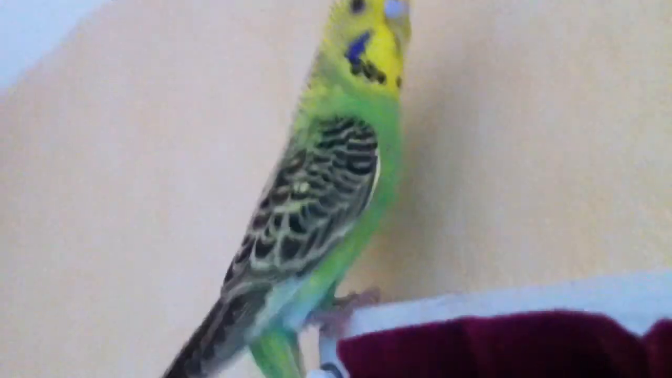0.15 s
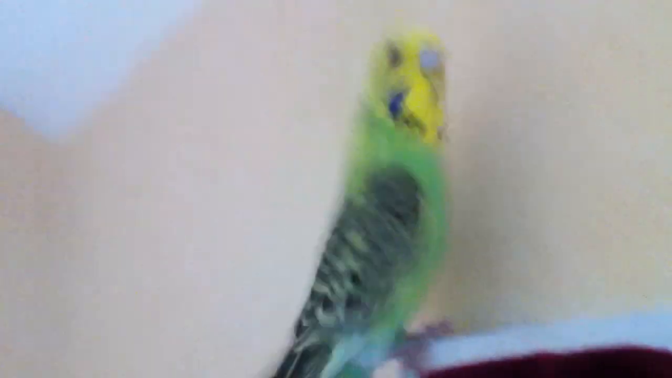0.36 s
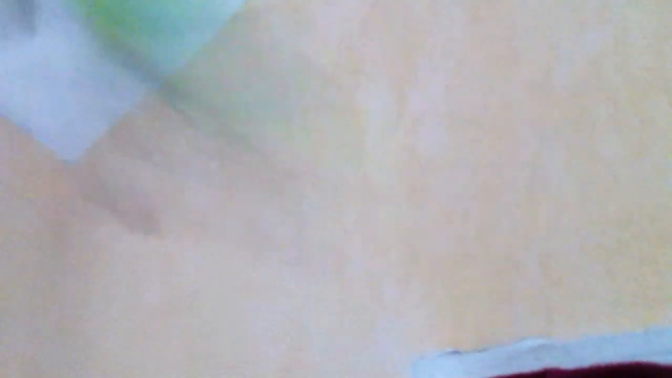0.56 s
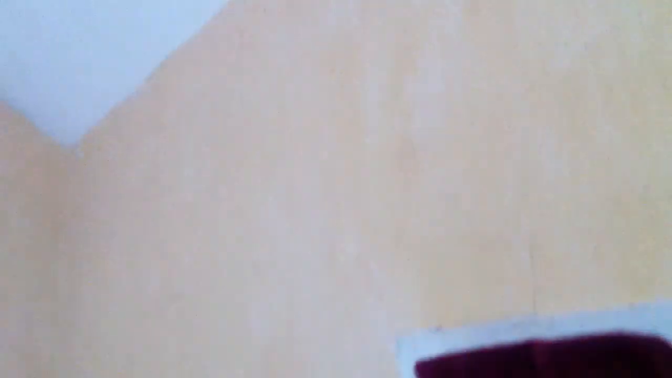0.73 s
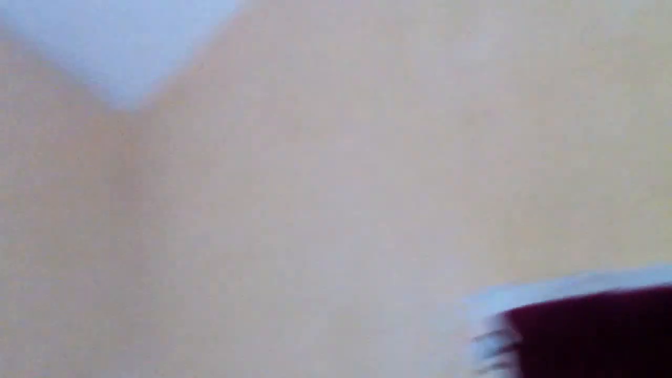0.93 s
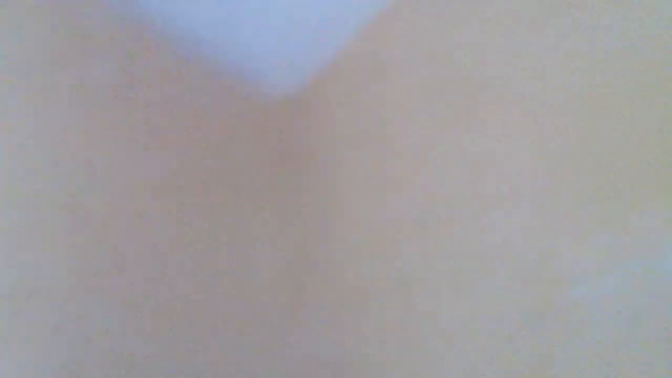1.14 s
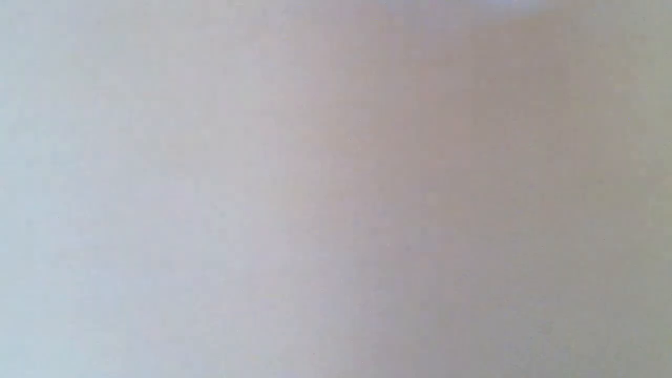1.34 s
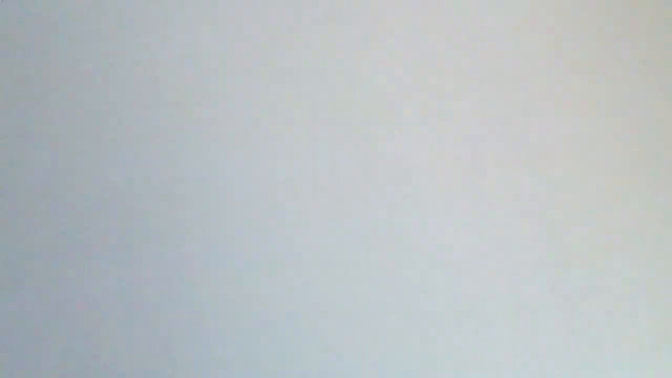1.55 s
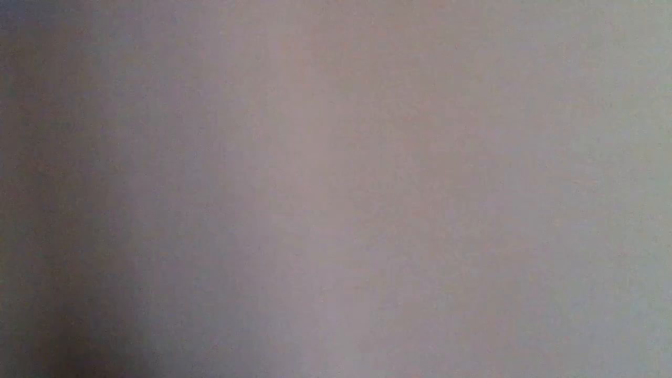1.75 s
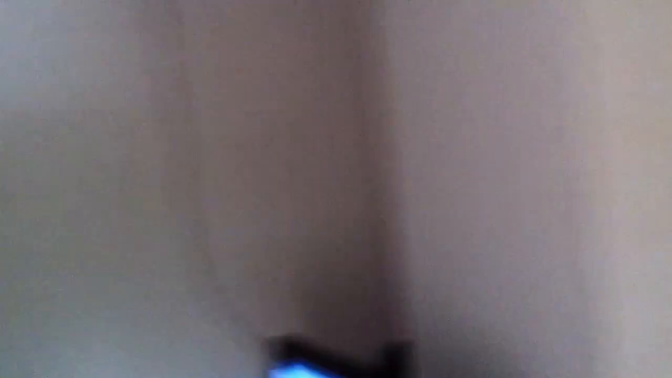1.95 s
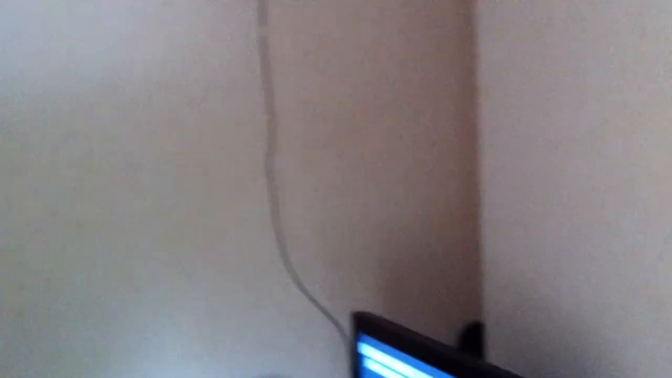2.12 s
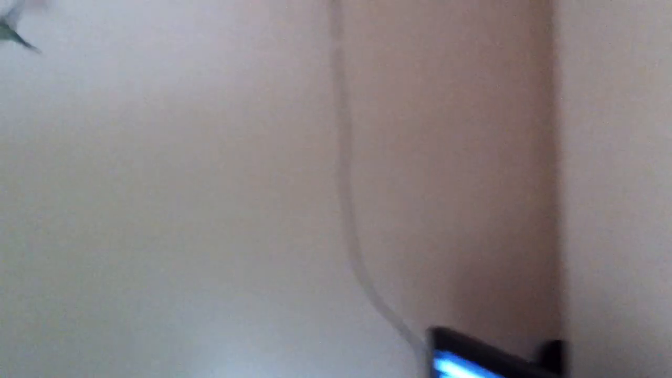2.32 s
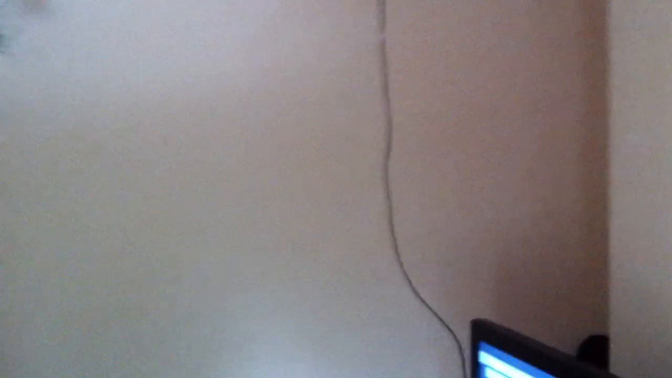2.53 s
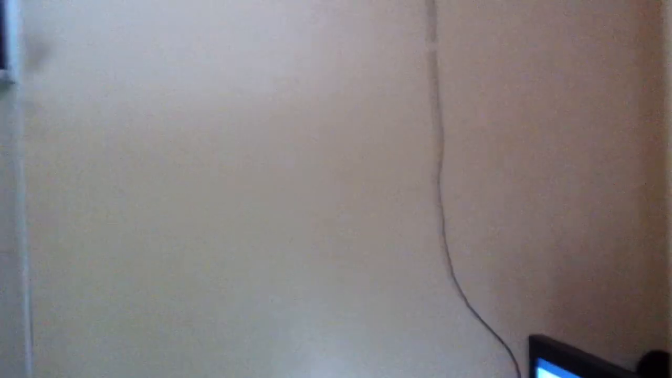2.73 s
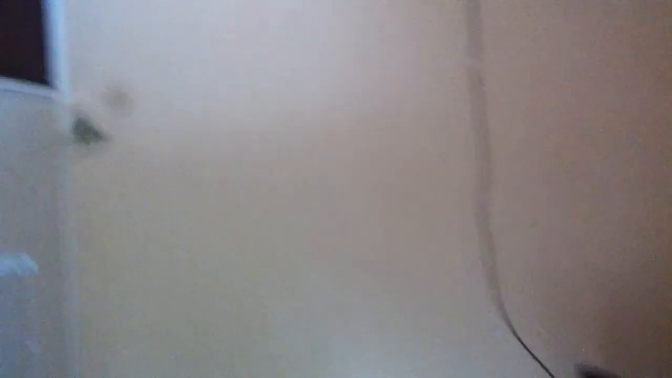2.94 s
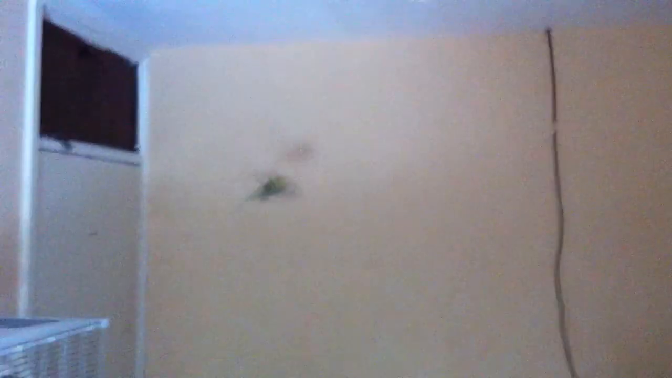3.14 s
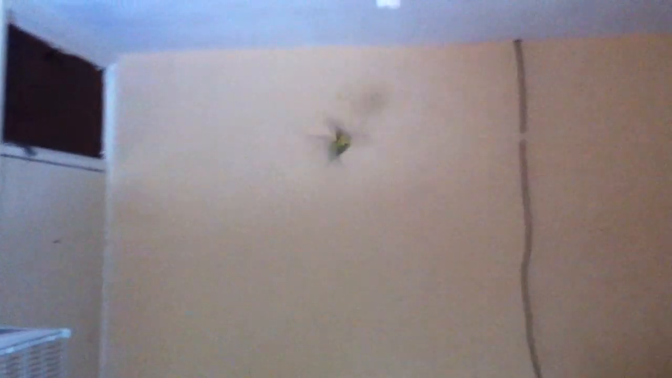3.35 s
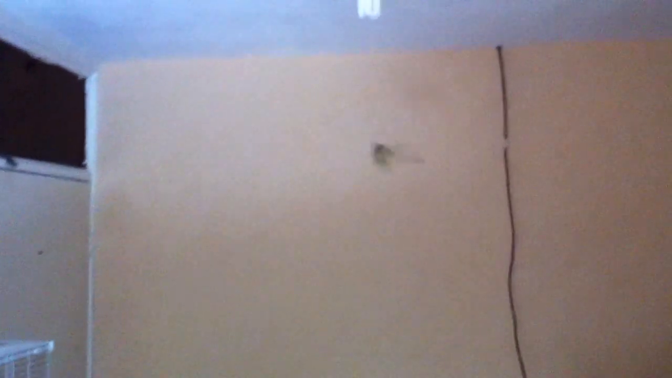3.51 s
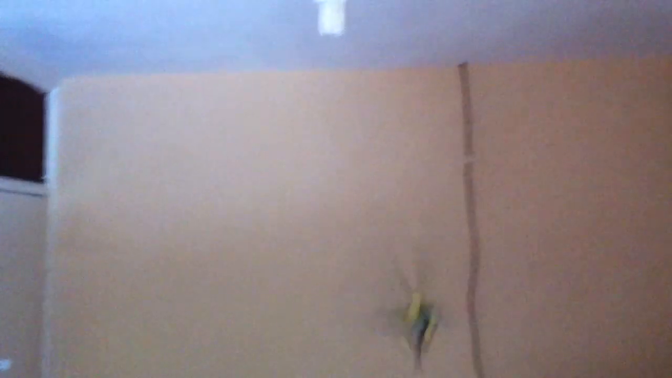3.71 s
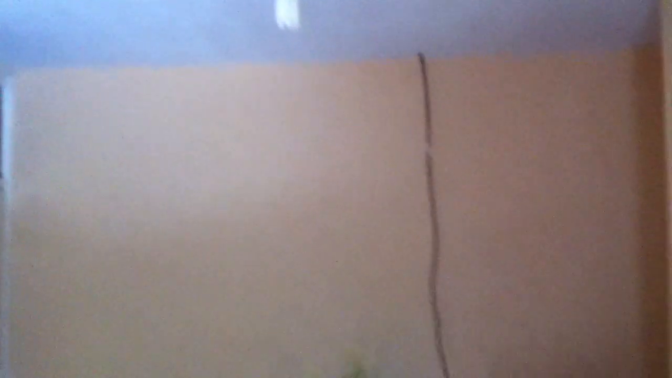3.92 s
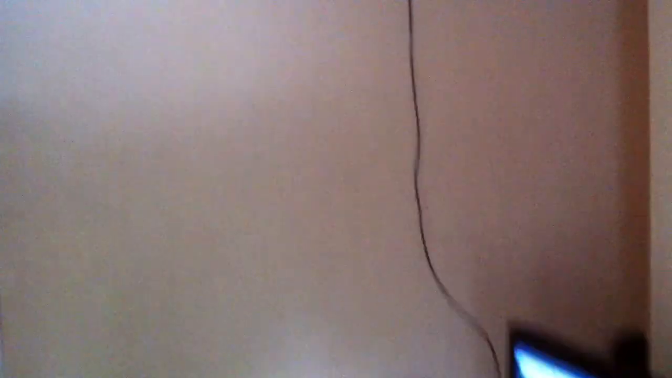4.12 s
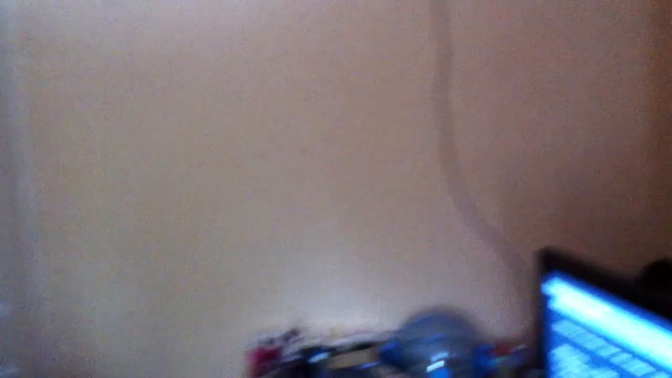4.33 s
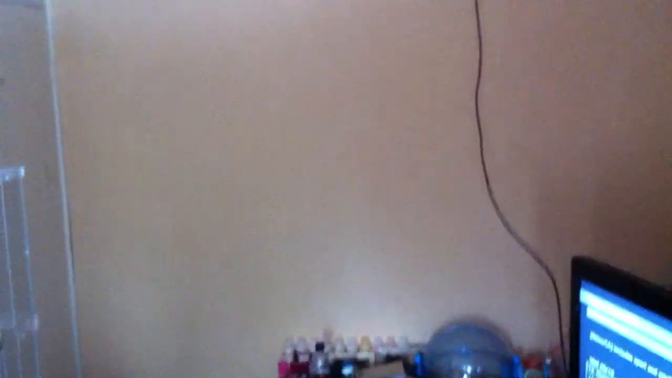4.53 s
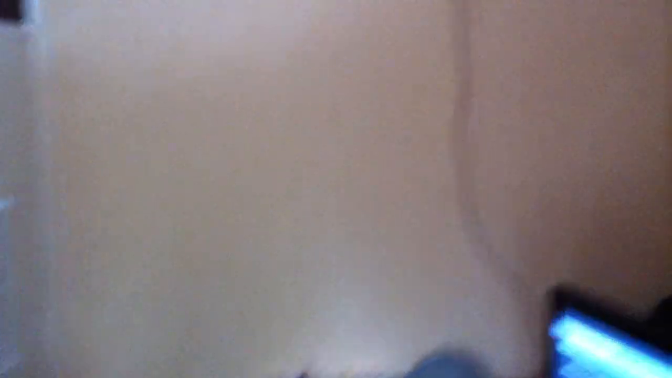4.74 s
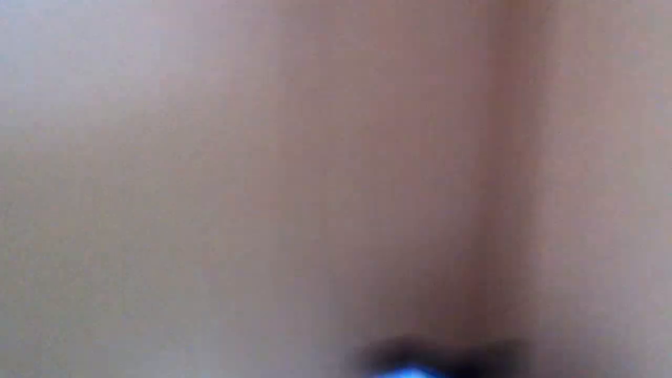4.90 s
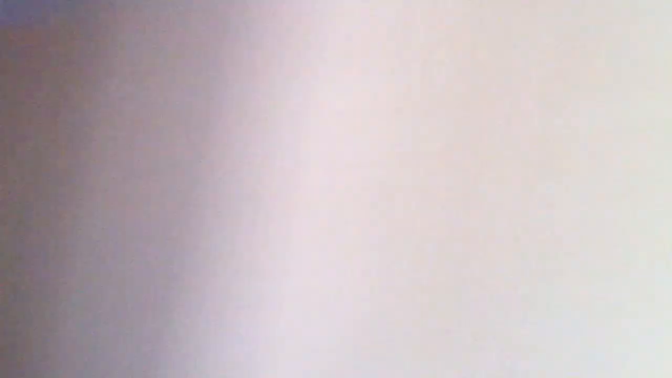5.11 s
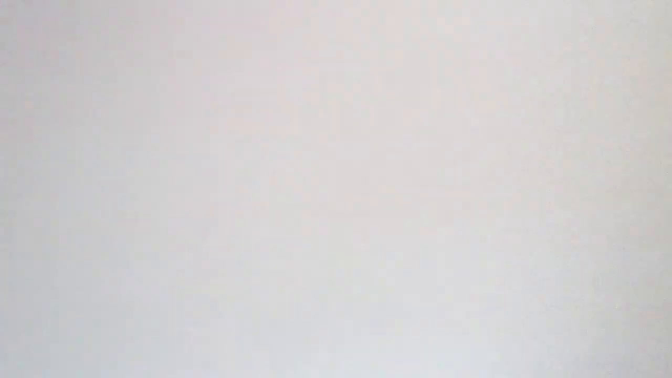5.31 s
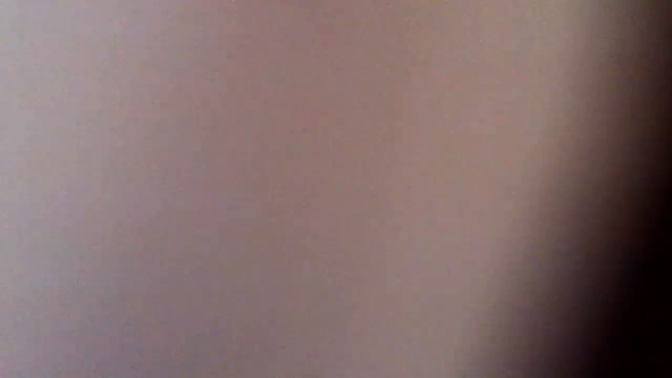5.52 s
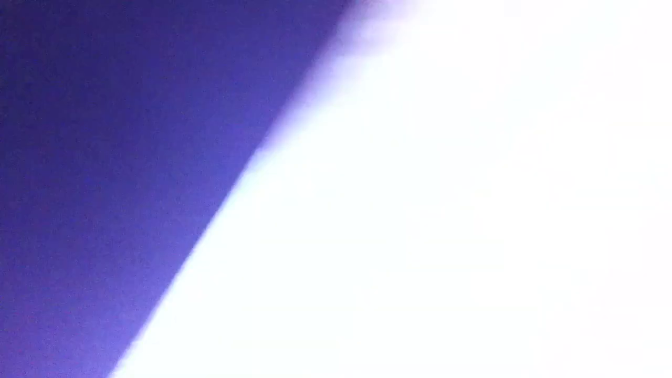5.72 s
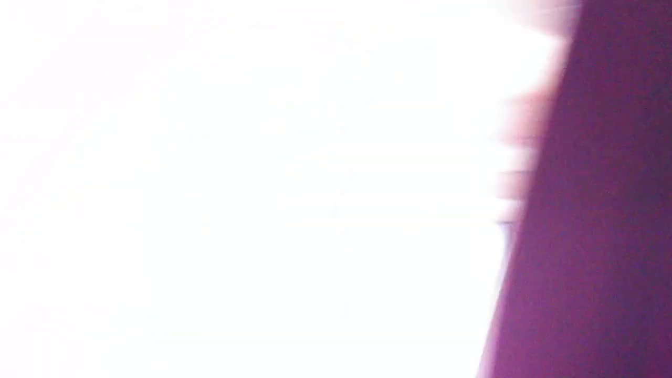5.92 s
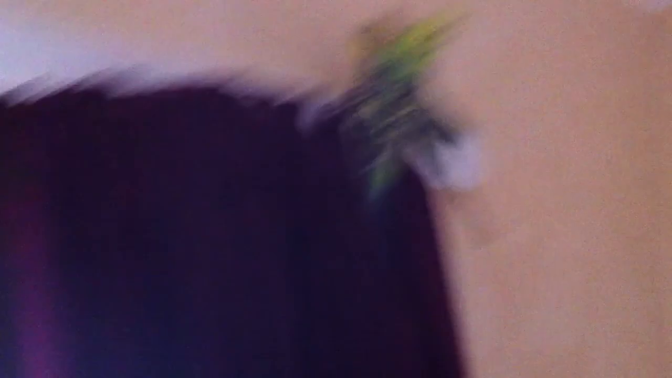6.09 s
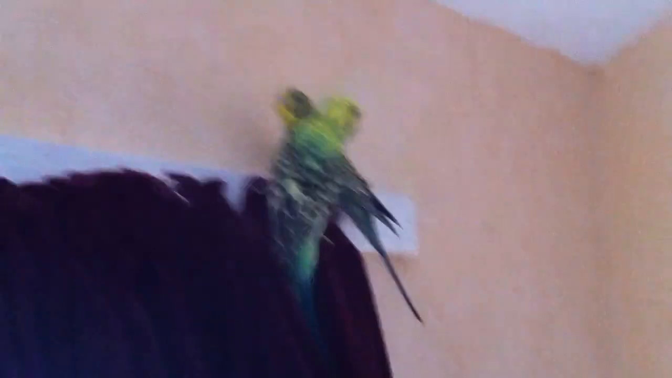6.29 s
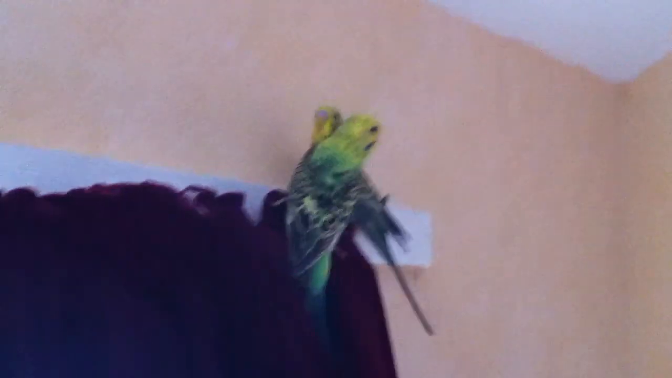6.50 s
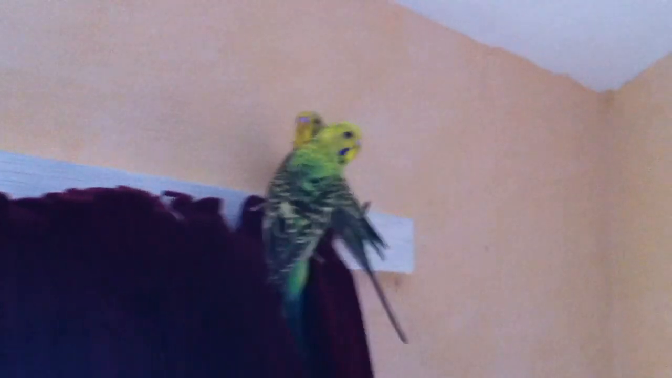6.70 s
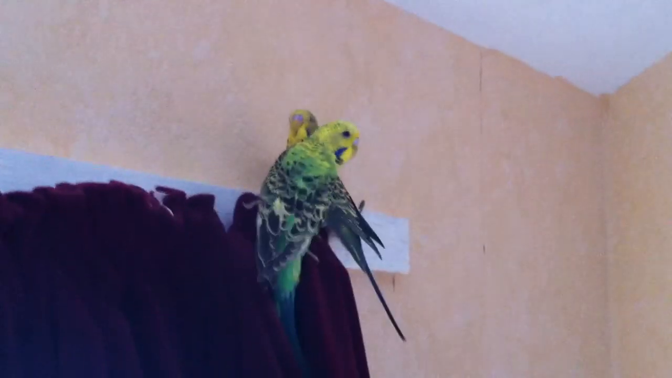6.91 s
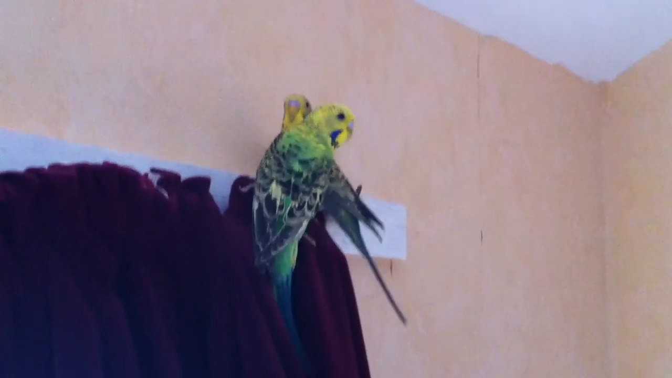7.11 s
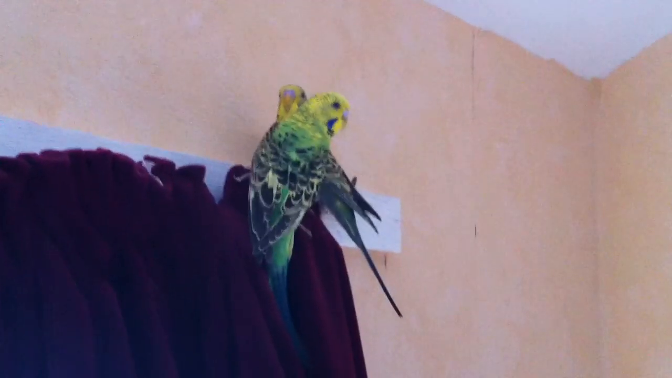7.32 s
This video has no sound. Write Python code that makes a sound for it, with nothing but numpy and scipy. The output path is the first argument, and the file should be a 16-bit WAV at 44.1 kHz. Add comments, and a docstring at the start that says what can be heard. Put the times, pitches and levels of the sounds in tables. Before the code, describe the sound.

Close wing wash overloads the scene first: irregular low thuds and gusts within the first second, softening soon after. A quiet chirp sits among them. Then only airy wing whirr and feather hiss are heard across a small plastered room, until one bird squawks loudly and rapidly. A knock and brisk flapping follow, then lighter flutters. After landing come faint ticks, one bright click, and quiet hiss with slight hum.

```python
"""Bursts of wing wash buffet the microphone as two budgerigars take off from the curtain rail beside it.
They circle a small room: feathers swish and snap, the wings whirr at a distance, and one bird gives
a soft chirp and later a loud squawk. Ticks and taps last beyond the landing, over faint hiss and hum.
Pressure swings and band noise make the wash, stroke-shaped noise the feathers, decaying noise the ticks
and slurred whistles the calls; feathers, ticks and calls also feed a short reverberation."""
import sys
import numpy as np
from scipy import signal
from scipy.fft import rfft, irfft
from scipy.io import wavfile

SR = 44100
rng = np.random.default_rng(int(sys.argv[2]) if len(sys.argv) > 2 else 0)


def to_wav(sig):
    """Store sig (one row per channel, or 1-D mono) as 16-bit WAV at the path in sys.argv[1].

    Samples outside -1..1 are clipped; the rate is SR.
    """
    pcm = np.clip(np.atleast_2d(sig), -1, 1) * 32767
    pcm = np.round(pcm).astype(np.int16)
    wavfile.write(sys.argv[1], SR, pcm.T)  # frames by channels


N = 324135
TIME = np.arange(N) / SR


def undb(db):
    """Decibels to gain."""
    return 10 ** (np.asarray(db) / 20)


def unit(x):
    """Scale to rms 1."""
    return x / np.sqrt(np.mean(x ** 2))


def level_curve(rows):
    """Join (s, dB) points by straight lines in time."""
    s, db = np.transpose(rows)
    return np.interp(TIME, s, db)


def along(points, hz):
    """Read (Hz, value) points on a log-frequency axis."""
    f, value = np.transpose(points)
    return np.interp(np.log(np.maximum(hz, 1)), np.log(f), value)


def coloured(x, colour):
    """Filter with a spectrum of (Hz, dB) points."""
    gain = undb(along(colour, np.fft.rfftfreq(N, 1 / SR)))
    return irfft(rfft(x) * gain, N)


def noise(colour):
    """Noise of rms 1 with the given spectrum."""
    return unit(coloured(rng.standard_normal(N), colour))


def band(x, low_hz, high_hz, order=2):
    """Butterworth band-pass."""
    sos = signal.butter(order, [low_hz, high_hz], "band", fs=SR, output="sos")
    return signal.sosfilt(sos, x)


def walk(rate, size=N):
    """Random wander of rms 1: straight lines between `rate` random knots per second."""
    knots = rng.standard_normal(size)
    return unit(np.interp(np.arange(size) * rate / SR, np.arange(size), knots))


def add(track, s, sound):
    """Mix a sound into a track from time s on."""
    i = max(int(s * SR), 0)
    track[i:i + len(sound)] += sound[:max(N - i, 0)]


def room_tone(floor_db=-69.0):
    """The empty room: faint even hiss with a hum that wavers in pitch."""
    # spectrum of the hiss: [f/Hz, relative level/dB]
    hiss_colour = [(18, -67), (30, -33.5), (114, -29.5), (137, -18.5), (208, -10), (243, -17), (299, -23.5),
                   (945, -23.5), (2910, -28.5), (3880, -29), (4540, -29.5), (7650, -30.5), (15500, -31.5)]
    # hum lines: [f/Hz, level/dB]
    hum_lines = [(215.3, -83), (441.4, -93.5)]
    hum = np.zeros(N)
    for hz, db in hum_lines:
        phase = 2 * np.pi * np.cumsum(hz + 2 * walk(4.7)) / SR
        hum += undb(db) * np.sqrt(2) * np.sin(phase)
    return undb(floor_db) * noise(hiss_colour) + hum


def room(x):
    """Small plastered room: noise bands decay at their own rates, the extreme treble fastest."""
    # time to decay by 60 dB: [f/Hz, decay/s]
    decay_times = [(150, 0.29), (1000, 0.3), (3200, 0.27), (8000, 0.33), (16000, .2)]
    t = TIME[:SR * 3 // 5]
    edges = np.geomspace(80, 20000, 9)
    tail = np.zeros(len(t))
    for low_hz, high_hz in zip(edges, edges[1:]):
        t60 = along(decay_times, np.sqrt(low_hz * high_hz))
        tail += band(rng.standard_normal(len(t)), low_hz, high_hz) * np.exp(-np.log(1000) * t / t60)
    # the tail starts 3 ms after the direct sound
    tail *= np.clip((t - .003) / 0.0013, 0, 1)
    return signal.fftconvolve(x, tail / np.sqrt(np.sum(tail ** 2)))[:N]


def whirr(whirr_db=-2.5, flutter_db=3.0, swell_width=0.21):
    """Air pushed aside by the wings, heard from across the room; now and then it swells with a hollow tone."""
    # whirr as the birds fly out: [t/s, relative level/dB]
    out_levels = [(1.7, -67.5), (1.986, -54), (2.212, -63.5), (2.6, -60), (2.738, -65.5), (2.838, -59),
                  (3.15, -61)]
    # whirr as they come back: [t/s, relative level/dB]
    back_levels = [(3.52, -61.5), (3.62, -47.5), (3.89, -57), (3.94, -72), (4.22, -57.5), (4.24, -51.5),
                   (4.33, -67.5), (5.1, -60), (5.46, -81), (5.72, -69.5), (5.89, -77), (6.04, -68),
                   (6.7, -84)]
    # spectrum of the whirr: [f/Hz, relative level/dB]
    whirr_colour = [(30, -37), (85, -22), (150, 2.5), (240, -2), (320, -2.5), (480, -3.5), (700, -12.5),
                    (1200, -18.5), (3000, -38)]
    # soft hollow swells: [centre t/s, relative level/dB, half length/s, centre f/Hz]
    hollow_swells = [(1.997, -62.5, 0.1, 510), (2.553, -60, 0.096, 440), (2.999, -64.5, 0.096, 450),
                     (3.643, -52, 0.054, 460), (5.04, -65, 0.084, 445)]
    level_db = level_curve(list(out_levels) + list(back_levels))
    out = noise(whirr_colour) * undb(level_db + whirr_db)
    air = rng.standard_normal(N)
    for s, db, length, hz in hollow_swells:
        tone = unit(band(air, hz * (1 - swell_width), hz * (1 + swell_width)))
        out += undb(db) * tone * np.exp(-((TIME - s) / length) ** 2 / 2)
    return out * undb(flutter_db * walk(36))


def ticks(claw_clicks=3):
    """Snaps, taps and a skipping claw: short decaying cracks, each in its band, direct and sent to the room."""
    # bright feather snaps: [t/s, level/dB, fade/s, room send/dB]
    feather_snaps = [(0.056, -47, 0.022, -24), (.303, -43.5, 0.0013, -1), (.8655, -30.5, .003, -14),
                     (3.591, -40.5, 0.0093, -7), (3.6737, -30.5, .002, 1.5), (4.29, -60, 0.0026, -20)]
    # dull taps and bumps around the room: [t/s, level/dB, fade/s, centre f/Hz, room send/dB]
    dull_taps = [(.656, -45, 0.007, 657, 3.5), (.951, -44, 0.0052, 700, -7), (2.456, -43, .002, 900, -16.5),
                 (3.616, -26.5, 0.0021, 1220, -8.5), (5.046, -49, .004, 1430, -1),
                 (6.05, -57, 0.0081, 480, 5.5), (6.269, -60, .0047, 2460, -3),
                 (6.808, -57.5, 0.018, 1810, -2), (7.025, -56, 0.0062, 1900, -3.5),
                 (7.106, -58.5, 0.005, 1250, -5.5), (7.24, -49, 0.0097, 700, -2.5)]
    tap_spread = 2.26  # a tap reaches this factor above and below its centre
    cracks = [(s, db, fade, 604, 12150, room_db) for s, db, fade, room_db in feather_snaps]
    for s, db, fade, hz, room_db in dull_taps:
        cracks.append((s, db, fade, hz / tap_spread, hz * tap_spread, room_db))
    # a claw clicks on the rail and skips on every 6 ms, 12 dB weaker each time
    for k in range(claw_clicks):
        cracks.append((6.7745 + k * .006, -25.5 - k * 12, .0006, 6300, 14500, -11))
    direct, send = np.zeros(N), np.zeros(N)
    t = TIME[:SR // 10]
    for s, db, fade, low_hz, high_hz, room_db in cracks:
        burst = unit(band(rng.standard_normal(len(t)), low_hz, high_hz))
        crack = undb(db) * burst * np.exp(-t / fade)
        add(direct, s, crack)
        add(send, s, crack * undb(room_db))
    return direct, send


def chirp(length, from_hz, to_hz, rasp, jitter=.016, rasp_jitter=0.022, tremor=.016, shimmer_db=3.,
          half_db=-10., buzz_hz=690., buzz_db=-13.5):
    """One note: the syrinx slurs a tremulous whistle; rasp shakes the pitch and adds half-pitch lines."""
    # first harmonics of the voice, from the fundamental up: [level/dB]
    harmonic_levels = [-3, -25.5, -31, -32.5, -32.5]
    attack_s, release_s = 0.0026, 0.0033
    t = np.arange(0, length, 1 / SR)
    hz = from_hz + (to_hz - from_hz) * np.sin(np.pi / 2 * t / length) ** 2
    wobble, flutter, quaver = (walk(rate, size=SR // 4)[:len(t)] for rate in (1500, 450, 300))
    shaken_hz = hz * (1 + (jitter + rasp_jitter * rasp) * wobble + tremor * quaver)
    phase = 2 * np.pi * np.cumsum(shaken_hz) / SR
    voice = sum(undb(db) * np.sin((k + 1) * phase) for k, db in enumerate(harmonic_levels))
    # alternate cycles differ where the note rasps
    halves = np.sin(phase / 2) + voice * np.cos(phase / 2)
    # on the high notes a fast buzz of the membrane throws a sideband below the whistle
    sideband = np.clip((hz - 2900) / 300, 0, 1) * np.sin(phase - 2 * np.pi * buzz_hz * t)
    voice = voice + np.clip(rasp, 0, 1) * undb(half_db) * halves / 2 + undb(buzz_db) * sideband
    envelope = np.clip(np.minimum(t / attack_s, (length - t) / release_s), 0, 1)
    return np.sqrt(2) * voice * envelope * undb(shimmer_db * flutter)


def budgie():
    """A soft chirp, then a loud squawk: slurred notes coloured by throat and beak."""
    # notes of both calls: [start t/s, length/s, from f/Hz, to f/Hz, relative level/dB, rasp 0-1]
    call_notes = [(1.013, 0.027, 2700, 2550, -42.5, .1), (1.037, 0.045, 3314, 3256, -43.5, 0.9),
                  (1.064, 0.017, 2690, 2670, -42, .2), (1.077, 0.026, 3300, 3260, -43, .3),
                  (1.099, 0.023, 2743, 2543, -41.5, 0.35), (1.108, 0.017, 3525, 3424, -40, .4),
                  (3.174, .009, 4340, 3897, -30.5, 0), (3.182, .018, 3090, 3100, -27.5, .7),
                  (3.197, 0.012, 3896, 4050, -26.5, 0.9), (3.204, 0.022, 4097, 2791, -21.5, 0.2),
                  (3.229, 0.028, 4060, 3160, -24.5, 0), (3.24, 0.013, 1674, 2170, -27, 0),
                  (3.249, .043, 4200, 2646, -21, .05), (3.293, 0.018, 3690, 3793, -19, 0),
                  (3.318, 0.041, 2630, 2770, -28.5, 0.2), (3.366, .025, 3523, 3434, -27.5, 0.4),
                  (3.402, 0.019, 2816, 2485, -32, .1), (3.415, .038, 3476, 3387, -35, 0.13)]
    # colour of throat and beak: [f/Hz, gain/dB]
    throat_colour = [(1000, -27), (1600, -2.5), (2700, -1), (4200, 0), (5200, 1.5), (6300, 1.5), (7300, 4),
                     (9300, 7), (11000, -17.5), (15000, 9.5)]
    out = np.zeros(N)
    for s, length, from_hz, to_hz, db, rasp in call_notes:
        add(out, s, undb(db) * chirp(length, from_hz, to_hz, rasp))
    return coloured(out, throat_colour)


def airborne(landed_s=6.3, settle_s=.2):
    """1 while the birds fly; dies away exponentially once they have landed."""
    return np.exp(-np.maximum(TIME - landed_s, 0) / settle_s)


def feathers(rush_db=1., beat_db=1.1, grain_db=2.0):
    """Feathers hiss at every stroke and rub over each other in fine grains; far strokes are duller."""
    # flurries of hard strokes:
    # [first stroke t/s, strokes/count, first level/dB, last level/dB, dull share 0-1]
    stroke_flurries = [(.055, 1, -44.5, -44.5, 0.03), (.204, 3, -52, -52, .7), (.654, 3, -50.5, -46, 0.06),
                       (0.892, 2, -49.5, -66, 1), (1.163, 1, -56.5, -56, 0.5), (2.217, 2, -56, -51, 0.34),
                       (2.965, 1, -60, -60, .9), (3.571, 2, -49, -40, 0.46), (3.694, 2, -47, -46.5, 0),
                       (4.178, 3, -54.5, -48.5, 0.03), (4.57, 5, -54.5, -60, 0), (5.575, 1, -56, -58, .4),
                       (5.688, 3, -54, -56, 0.73)]
    # air rushing through the flight feathers as the birds come and go: [t/s, relative level/dB]
    rush_levels = [(.1, -60), (.55, -61.5), (.71, -54.5), (.82, -63.5), (.9, -58.5), (1.3, -67),
                   (1.75, -64.5), (2.3, -61), (2.7, -66), (3.05, -62.5), (3.53, -66), (3.69, -50.5),
                   (3.86, -59), (3.98, -71), (4.15, -61.5), (4.4, -69), (5.07, -65), (5.25, -74.5),
                   (5.77, -62), (5.86, -75)]
    # spectrum of near strokes and of the rush: [f/Hz, relative level/dB]
    near_colour = [(30, -24), (150, -4), (400, 3), (900, 3.5), (2200, 3), (4500, -1.5), (8000, -2.5),
                   (14000, -2), (16000, -5.5)]
    # spectrum of far strokes: [f/Hz, relative level/dB]
    far_colour = [(30, -33.5), (150, -12.5), (500, -7.5), (1000, -1.5), (1900, -1.5), (3000, -5.5),
                  (5000, -15.5), (15000, -23)]
    wing_beat_hz, rise_s, fade_s = 18., .013, .011
    bright, dull = np.zeros(N), np.zeros(N)  # power of the near and far strokes
    t = TIME[:SR // 4]
    fade = np.exp(-np.abs(t - rise_s) / fade_s / 2)
    stroke = np.where(t < rise_s, (t / rise_s) ** 2, fade)
    for first, count, first_db, last_db, dull_share in stroke_flurries:
        count = int(count)
        times = first + np.arange(count) / wing_beat_hz
        for s, db in zip(times, np.linspace(first_db, last_db, count)):
            power = (undb(db) * stroke) ** 2
            add(bright, s - rise_s, (1 - dull_share) * power)
            add(dull, s - rise_s, dull_share * power)
    # between the strong strokes the rush throbs with a slightly uneven wing beat
    beat = np.sin(2 * np.pi * np.cumsum(wing_beat_hz * (1 + 0.089 * walk(20.0))) / SR)
    rush = undb(level_curve(rush_levels) + rush_db + beat_db * beat) * airborne()
    hiss = noise(near_colour) * np.sqrt(bright + rush ** 2) + noise(far_colour) * np.sqrt(dull)
    return hiss * undb(grain_db * walk(900))


def pressure_swing(hz, ring=1.1, port_hz=230., port_width_hz=85., bass_cut_hz=125.0,
                   steepness=0.92, tail_power=2.84):
    """One eddy swings the pressure at the microphone, which cuts its bass and rings low after it."""
    t = np.arange(-SR // 20, SR // 20) / SR
    u = np.pi * hz * steepness * t
    swing = band(u / (1 + u ** 2 / 2) ** (tail_power + 1), bass_cut_hz, 2000, order=3)
    ringing = band(swing, port_hz - port_width_hz / 2, port_hz + port_width_hz / 2, order=1)
    return swing + ring * ringing


def wing_wash(gustiness_db=4.0, fast_db=7.0, fast_low_hz=300., fast_high_hz=560.):
    """Strong eddies hit the microphone as single pressure swings; smaller ones churn in the birds' wakes."""
    # the strongest eddies: [t/s, peak level/dB, nominal swing speed f/Hz]
    strong_eddies = [(0.056, -38.5, 160), (.214, -38, 146), (.366, -23, 499), (.383, -17.5, 399),
                     (0.388, -17.5, 620), (.393, -8.5, 434), (0.43, -16, 470), (.489, -11, 457),
                     (.497, -17, 260.1), (.511, -11.5, 380), (.52, -6.5, 304), (0.532, -15, 230),
                     (.555, -15.5, 274), (.583, -17.5, 280), (.591, -12.5, 497), (.659, -30, 193),
                     (.716, -22.5, 124), (0.848, -30, 182), (.953, -27, 197), (1.034, -30.5, 210),
                     (1.087, -23, 187), (1.134, -26, 256), (1.177, -20.5, 410), (1.257, -32.5, 158),
                     (1.426, -40, 195), (1.559, -38, 182), (1.64, -38.5, 203)]
    # spells in the wake of a bird: [start t/s, end t/s, first relative level/dB, last relative level/dB]
    wake_spells = [(0.025, 0.345, -58, -53), (.364, 0.416, -31, -31), (0.446, .588, -33, -32),
                   (.658, 0.823, -45, -49), (0.906, 1.189, -47, -40), (1.205, 1.8, -54.5, -62),
                   (4.229, 4.246, -46.5, -48.5), (4.28, 4.836, -65.5, -64)]
    # spectrum of the slower churn: [f/Hz, relative level/dB]
    wash_colour = [(20, -44), (45, -34), (75, -7.5), (140, 1.5), (220, 1.5), (400, -11.5), (700, -17.5),
                   (1300, -34), (2500, -53.5)]
    edge_db_per_s = 1600.  # how fast a wake arrives and leaves
    out = np.zeros(N)
    for s, db, hz in strong_eddies:
        swing = pressure_swing(hz)
        size = np.abs(signal.hilbert(swing))
        # the envelope peaks at time s; the sign is random
        add(out, s - np.argmax(size) / SR, undb(db) * swing / size.max() * rng.choice([-1, 1]))
    wake = np.zeros(N)
    for start, end, first_db, last_db in wake_spells:
        outside = np.abs(TIME - np.clip(TIME, start, end))
        wake += undb(np.interp(TIME, [start, end], [first_db, last_db]) - edge_db_per_s * outside)
    # the stronger the wake, the larger the share of small fast eddies
    fast = unit(band(rng.standard_normal(N), fast_low_hz, fast_high_hz, order=3))
    churn = noise(wash_colour) + undb(fast_db) * np.sqrt(wake) * fast
    churn = churn * wake * undb(gustiness_db * walk(110) - 1.5)
    return out + band(churn, 75, 1300)  # the part of the wake that the microphone passes


def scene():
    """Wing wash acts on the microphone alone; feathers, ticks and calls also sound in the room."""
    swish = feathers()
    tick, tick_send = ticks()
    calls = budgie()
    reverb = room(undb(-15.5) * swish + tick_send + undb(-7.0) * calls)
    near = wing_wash() + swish + tick + undb(-4) * calls
    return (near + whirr() + reverb + room_tone())[None]


def record(dry):
    """The recorder cuts steeply above 16 kHz."""
    return signal.sosfilt(signal.ellip(10, .2, 70, 16000, fs=SR, output="sos"), dry)


dry = scene()
out = record(dry)
to_wav(out)
```